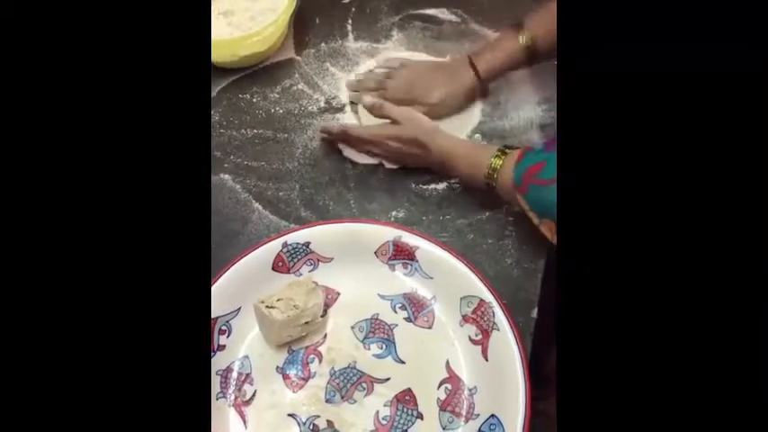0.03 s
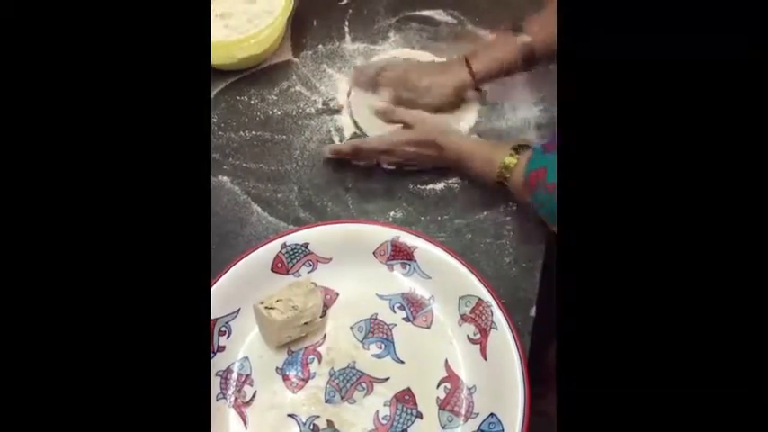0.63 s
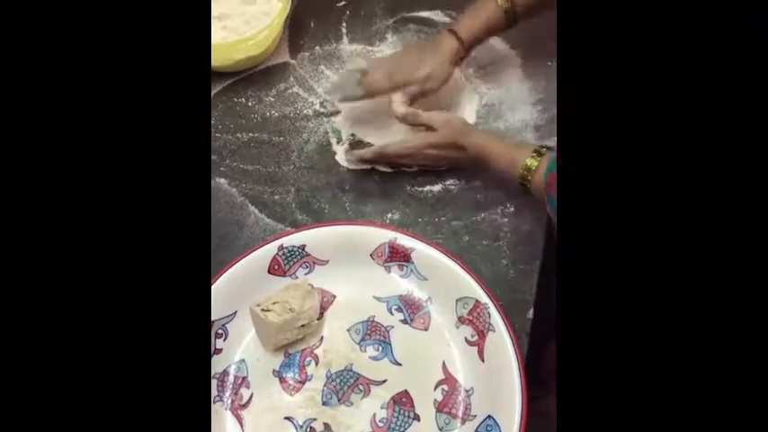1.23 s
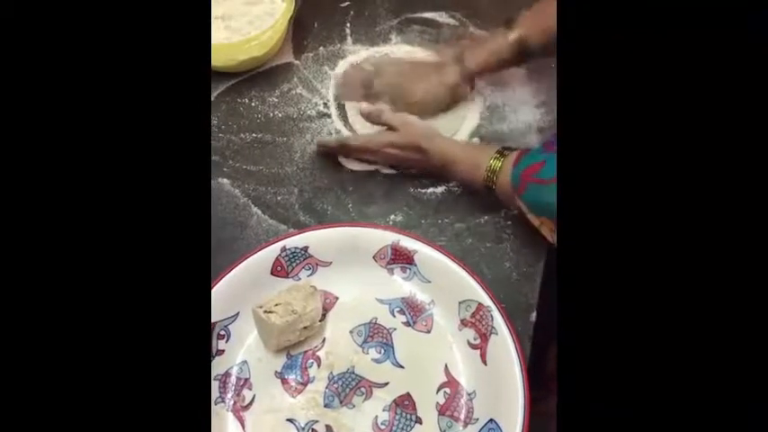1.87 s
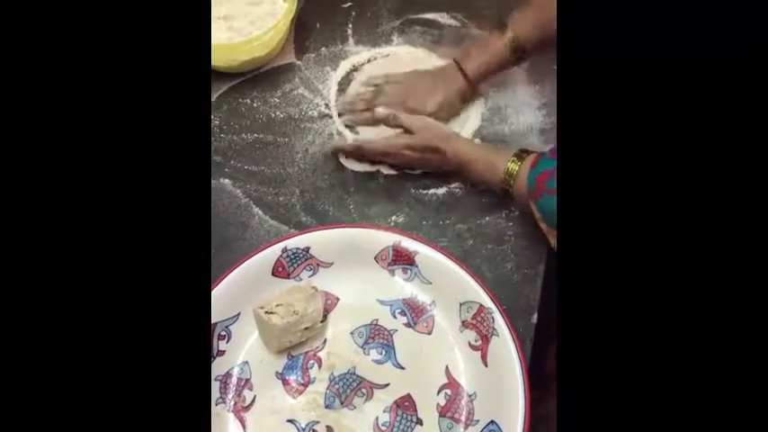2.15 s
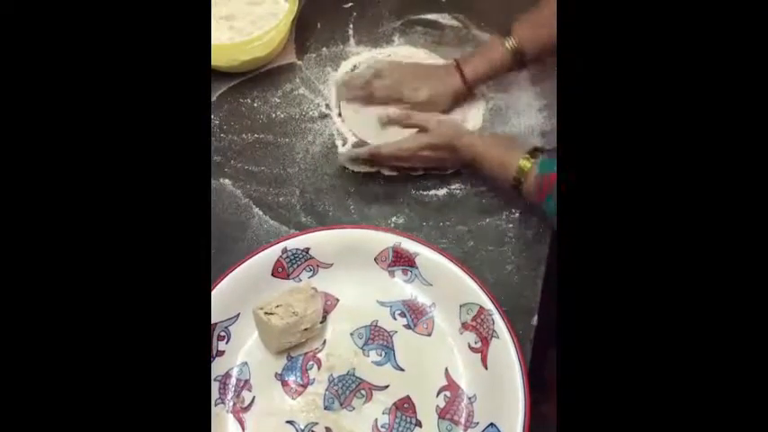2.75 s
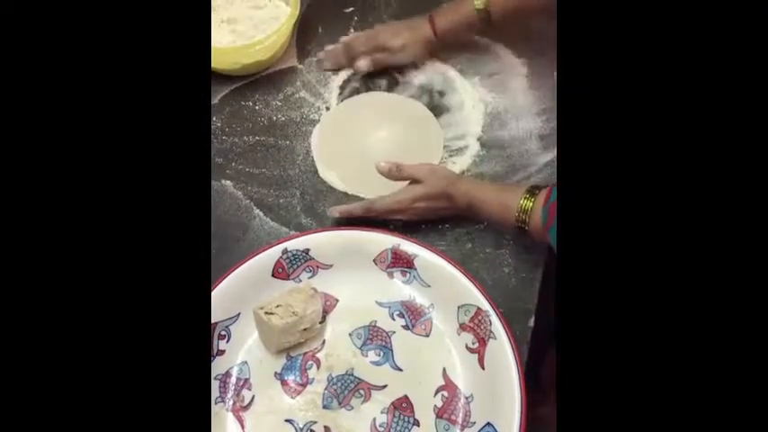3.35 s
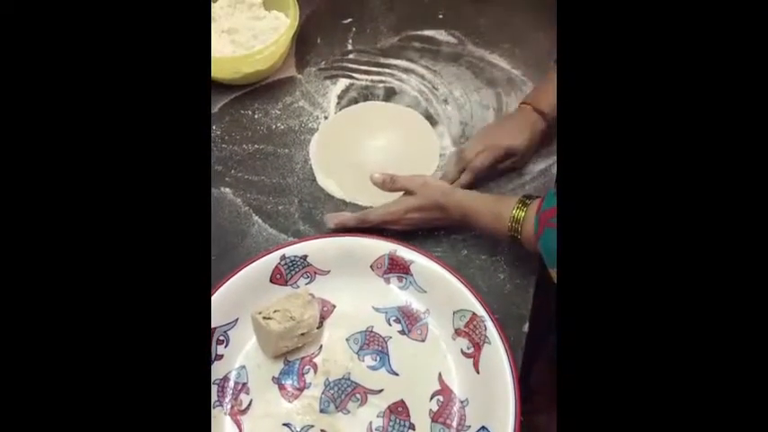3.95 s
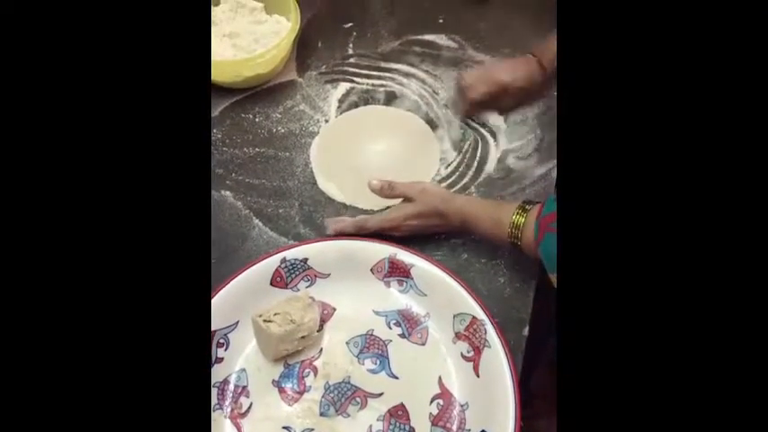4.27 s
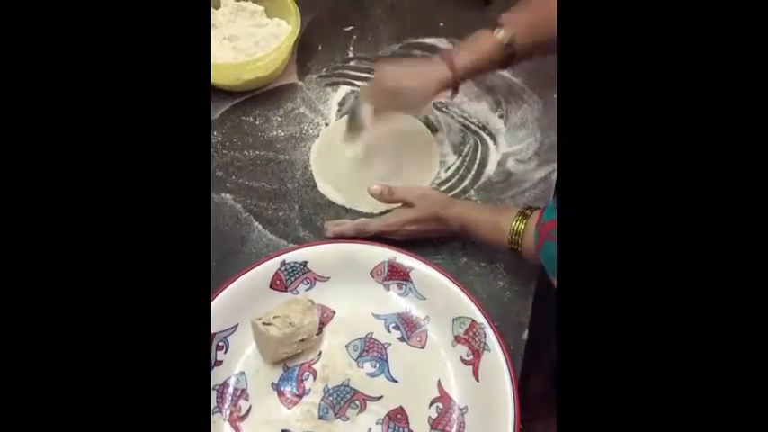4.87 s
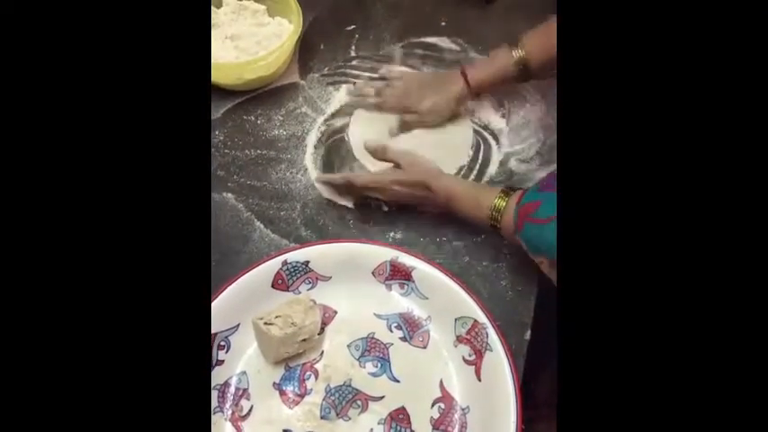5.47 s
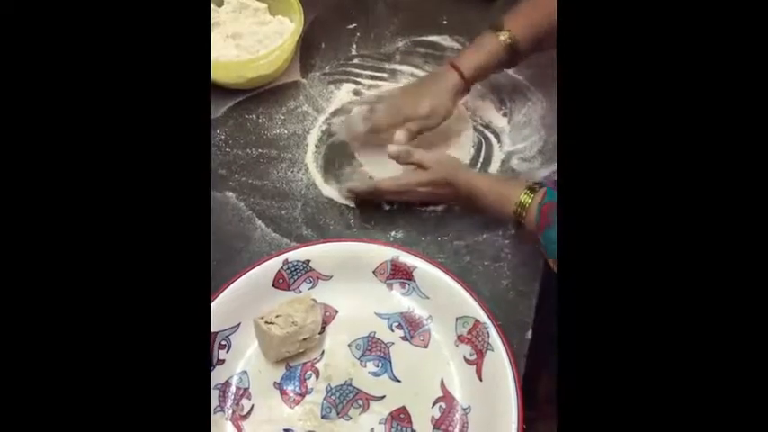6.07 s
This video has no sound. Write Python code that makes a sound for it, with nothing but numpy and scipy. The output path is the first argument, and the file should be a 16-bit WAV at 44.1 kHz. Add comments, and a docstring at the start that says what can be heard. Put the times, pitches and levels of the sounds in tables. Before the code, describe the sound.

Hands pat a round of dough flat on a floured countertop, about four pats a second, each a sharp smack with a low thud. The dough hisses faintly as it turns. The pats stop while a hand softly sweeps up flour and sprinkles a pinch, then three more pats follow. The microphone is close, in a small kitchen with a brief echo.

```python
"""A small kitchen, close to a floured counter: hands pat a round of dough flat, about four pats a second.
Each impact expels air in a smack and excites the counter's modes in a boom; the room reverberates briefly.
Sliding friction makes the dough hiss as it is turned on the flour. In the pause a hand sweeps flour
together and sprinkles it, then the pats resume. The house rumbles faintly throughout."""
import sys
import numpy as np
from scipy import signal
from scipy.fft import rfft, irfft, next_fast_len
from scipy.io import wavfile
from scipy.ndimage import uniform_filter1d

SR = 44100
rng = np.random.default_rng(int(sys.argv[2]) if len(sys.argv) > 2 else 0)


def unload_wav(signal):
    """Save mono or channel-first audio to the path in sys.argv[1] as 16-bit WAV at rate SR, clipped to [-1, 1]."""
    wavfile.write(
        sys.argv[1],
        SR,
        np.round(np.clip(np.atleast_2d(signal).T, -1, 1) * 32767).astype(np.int16),
    )


N = 269451
TIME = np.arange(N) / SR
RING_TIME = np.arange(SR) / SR


def undb(db):
    """Decibels to amplitude ratio."""
    return 10 ** (np.asarray(db) / 20)


def unit(x):
    """Normalisation to rms 1."""
    return x / np.sqrt(np.mean(x ** 2))


def add(out, start_s, x):
    """Superposition of x on out from start_s."""
    i = int(start_s * SR)
    out[i:i + len(x)] += x[:N - i]


def decay(age, t60):
    """Exponential damping: 60 dB down after t60 seconds."""
    return np.exp(-np.log(1000) * age / t60)


def walk(rate_hz):
    """Smooth random modulation with rms 1."""
    hold = int(SR / rate_hz)
    steps = np.repeat(rng.standard_normal(N // hold + 1), hold)
    return unit(uniform_filter1d(steps, hold)[:N])


def log_interp(hz, points):
    """Interpolation of (frequency, level) points on a log-frequency axis."""
    points = np.array(points)
    return np.interp(np.log(hz + 1), np.log(points[:, 0]), points[:, 1])


def causal(x, gain):
    """Minimum-phase filtering by a gain per bin, through the folded cepstrum."""
    cepstrum = irfft(np.log(gain), len(x))
    cepstrum[1:len(x) // 2] *= 2
    cepstrum[len(x) // 2 + 1:] = 0
    return irfft(rfft(x) * np.exp(rfft(cepstrum)), len(x))


def colour(x, spectrum, tilt_db=0):
    """Spectral shaping, with a tilt per octave about 2 kHz that levels off below 500 Hz."""
    padded = np.pad(x, (0, next_fast_len(2 * len(x)) - len(x)))
    hz = np.fft.rfftfreq(len(padded), 1 / SR)
    octaves = np.log2(np.maximum(hz, 500) / 2000)
    return causal(padded, undb(log_interp(hz, spectrum) + tilt_db * octaves))[:len(x)]


def whiten(x, bins):
    """Spectral whitening: ripple finer than the given number of bins survives."""
    power = uniform_filter1d(abs(rfft(x)) ** 2, size=bins)
    return causal(x, 1 / np.sqrt(power))


def resonance(x, hz, width_hz):
    """Second-order resonator with gain 1 at its centre."""
    return signal.lfilter(*signal.iirpeak(hz, hz / width_hz, fs=SR), x)


def pocket(x, hz, db, q):
    """Cavity resonance: trapped air lifts one band by db, with quality factor q."""
    return x + (undb(db) - 1) * resonance(x, hz, hz / q)


# low room modes: (frequency [Hz], bandwidth [Hz], relative level [dB])
RUMBLE_MODES = [(63.7, 15.7, 8), (94.4, 19.5, 3.5), (131.6, 20.4, 0), (194, 19, -3.5), (257.8, 5.8, -3),
                (293, 12, -6), (392, 19, -15)]
# background hiss: (frequency [Hz], relative spectral density [dB])
HISS_SPECTRUM = [(25, -16), (80, -5), (160, -4.5), (320, -4), (500, -11.5), (1000, -11.5), (1600, -14.5),
                 (3200, -15.5), (7000, -21), (11000, -21.5)]
def background(rumble_db=-56, wander_db=0.41, hiss_db=-59.5):
    """Standing waves in the room gather the rumble of the house, under a faint hiss."""
    rumble = 0
    for hz, width, db in RUMBLE_MODES:
        stage_width = 1.6 * width  # two stages in series narrow to about the mode's bandwidth
        first_stage = resonance(rng.standard_normal(N), hz, stage_width)
        rumble += undb(db) * resonance(first_stage, hz, stage_width)
    hiss = unit(colour(rng.standard_normal(N), HISS_SPECTRUM))
    return unit(rumble) * undb(rumble_db + wander_db * walk(4.4)) + hiss * undb(hiss_db)


# counter modes: (frequency [Hz], level [dB], decay time T60 [s], sign of first swing [+1 or -1])
COUNTER_MODES = [(85, -31.3, 0.252, -1), (104, -26.1, 0.35, -1), (109, -19.5, 0.266, -1),
                 (126, -16.2, 0.169, 1), (132, -25.7, 0.35, 1), (175, -33.7, 0.35, -1),
                 (192, -20.1, 0.175, 1), (239, -24.5, 0.09, 1), (258, -11.8, 0.161, -1),
                 (261, -11.9, 0.118, -1), (271, -25.4, 0.199, 1), (290, -26.1, 0.265, 1),
                 (337, -14.0, 0.08, -1), (352, -17.3, 0.09, 1), (383, -31.7, 0.21, 1),
                 (414, -37.0, 0.251, -1), (514, -36.7, 0.214, -1), (545, -34.5, 0.186, -1),
                 (581, -23.8, 0.067, 1), (613, -20.1, 0.067, 1), (642, -40.1, 0.263, -1),
                 (767, -26.3, 0.083, 1)]
def boom(swell_s=0.007, detune=0.004):
    """Modal vibration: soft dough spreads the blow, so the counter's modes swell before they decay."""
    hz, db, t60, sign = np.array(COUNTER_MODES).T[:, :, None]
    hz = hz * (1 + detune * rng.standard_normal())  # the hand's weight shifts the modes
    modes = sign * undb(db) * np.sin(2 * np.pi * hz * RING_TIME) * decay(RING_TIME, t60)
    return modes.sum(axis=0) * (1 - np.exp(-RING_TIME / swell_s))


def room_bass(hz=90, width_hz=70, t60=1.0, db=-54):
    """Low-frequency impulse response: bass reverberates longer than treble."""
    return undb(db) * resonance(rng.standard_normal(SR), hz, width_hz) * decay(RING_TIME, t60)


def air_burst(landing_ms, count=4, snap_s=0.00067, squeeze_s=0.0057, squeeze_db=-7.5, scatter_db=2):
    """Air expulsion: palm and fingers land in turn, each with a snap; the rest is squeezed out after."""
    t = RING_TIME[:SR // 20]
    contacts_s = 0.0007 + (np.arange(count) + rng.random(count)) / count * landing_ms / 1000
    age = t - contacts_s[:, None]
    strengths = undb(scatter_db * rng.standard_normal((count, 1)))
    snaps = (strengths * (age > 0) * np.exp(-abs(age) / snap_s)).sum(axis=0)
    squeeze = undb(squeeze_db) * np.exp(-t / squeeze_s)
    return (snaps + squeeze) * rng.standard_normal(len(t))


# skin striking dough: (frequency [Hz], relative level [dB])
SMACK_SPECTRUM = [(80, -17), (300, 0), (500, -8.5), (630, -8.5), (800, -8.5), (1000, -3.5), (1600, -4.5),
                  (2500, -7.5), (3200, -12.5), (4000, -12.5), (5100, -11.5), (6400, -15), (8200, -15.5),
                  (11000, -22.5)]
def smack(burst, tilt_db, palm_hz, cupped_hz=810, cupped_db=7.5, flat_hz=1490, flat_db=2):
    """Cavity resonance: a cupped palm traps more air, so it rings lower and stronger than a flat one."""
    palm_db = log_interp(palm_hz, [(cupped_hz, cupped_db), (flat_hz, flat_db)])
    return pocket(colour(burst, SMACK_SPECTRUM, tilt_db), palm_hz, palm_db, q=3)


# resonances of the early room response: (frequency [Hz], bandwidth [Hz], relative level [dB])
EARLY_ROOM_RESONANCES = [(800, 12, -26), (943, 77, 9), (1357, 67, 2.5), (1718, 58, -0.5), (2222, 71, 8),
                         (2580, 51, 5), (5370, 72, 0)]
def with_early_room_rings(x, gain_db=-4):
    """Early reflections from nearby surfaces give each smack the same short ringing tones."""
    x = np.pad(x, (0, SR // 10))
    return x + sum(undb(gain_db + db) * resonance(x, hz, width) for hz, width, db in EARLY_ROOM_RESONANCES)


# kitchen reverberation: (frequency [Hz], decay time T60 [s], relative level [dB])
REVERB_BANDS = [(278, 0.57, 0), (1070, 0.44, -5.5), (2320, 0.39, -2.5), (5370, 0.37, -9),
                (10300, 0.36, -13.5)]
def kitchen_echoes(early_db=-25, early_t60=0.14, late_db=-35, delay_s=0.00299):
    """Impulse response: dense early reflections off counter and wall, then the room's diffuse tail."""
    hz = np.fft.rfftfreq(SR, 1 / SR)
    centres_hz = np.array(REVERB_BANDS)[:, 0]
    noise = rfft(rng.standard_normal(SR))
    age = np.maximum(RING_TIME - delay_s, 0)
    echoes = 0
    for share, (_, t60, db) in zip(np.eye(len(REVERB_BANDS)), REVERB_BANDS):
        band = irfft(noise * np.interp(hz, centres_hz, share), SR)
        fade = undb(early_db) * decay(age, early_t60) + undb(late_db) * decay(age, t60)
        echoes += undb(db) * band * fade
    return echoes * (RING_TIME > delay_s)


# hand impacts: (time [s], boom gain [dB], relative smack level [dB], tilt [dB/octave],
#                landing duration [ms], palm cavity [Hz], finger cavity [Hz])
IMPACTS = [(0.1225, 0, 0.5, 2, 3.24, 590, 4630), (0.3662, 1, .5, 0.9, 2.8, 2070, 4800),
           (0.6171, -4.5, -9.5, 1.2, 3.5, 820, 1900), (0.9133, 0, -1.5, 1.14, 2.8, 1310, 4500),
           (1.162, 2, 3.5, 0.8, 3.3, 1950, 5230), (1.406, -1.5, -1.5, 2.5, 3.4, 1040, 2930),
           (1.668, -5.5, -10.5, 1.1, 2.15, 915, 2400), (2.0173, .5, 1, 2.5, 2.28, 626, 5900),
           (2.2588, 2, 1.5, 0.64, 2.86, 1460, 3370), (2.5108, -1, 0, 0.5, 0.58, 3000, 5940),
           (2.769, -4, -4, -1.3, 4.2, 1830, 2900), (5.1398, -26.5, -28.5, -1, 6, 695, 1450),
           (5.561, -.5, -2, 0.3, 3, 790, 2050), (5.8135, 2, 1.2, 0, 1.56, 1360, 2960),
           (6.063, .5, -1.5, 0.5, 3.9, 895, 1700)]
def pats(smack_db=18):
    """Impact excitation: each pat radiates a boom and a smack, heard directly and by reflection."""
    out = np.zeros(N)
    for start, boom_db, db, tilt_db, landing_ms, palm_hz, finger_hz in IMPACTS:
        thud = undb(boom_db) * boom()
        add(out, start, thud)
        add(out, start, signal.fftconvolve(thud, room_bass()))
        burst = air_burst(landing_ms)
        gain = undb(smack_db + db)
        # the snaps interfere in a spectral ripple on the direct path; over all directions it averages out
        direct = gain * smack(whiten(burst, bins=25), tilt_db, palm_hz)
        diffuse = gain * smack(whiten(burst, bins=5), tilt_db, palm_hz)
        add(out, start, signal.fftconvolve(diffuse, kitchen_echoes()))
        direct = pocket(direct, finger_hz, db=5.5, q=3)  # the finger cavity is heard only close by
        add(out, start, with_early_room_rings(direct))
    return out


def rub(spectrum, grain_db=1, judder_db=0):
    """Granular friction: flour slips in dense tiny ticks; judder is uneven sliding pressure."""
    grains = rng.standard_normal(N) * undb(grain_db * walk(1500))
    return unit(colour(grains, spectrum)) * undb(judder_db * walk(35))


def stroke(start, length, peak, power):
    """Power-law envelope of a move from rest to rest, highest at the fraction peak of its length."""
    progress = np.interp(TIME, start + length * np.array([0, peak, 1]), [0, 0.5, 1])
    return abs(np.sin(np.pi * progress)) ** power


def strokes(rows, peak, power):
    """Friction noise grows as a power of sliding speed; overlapping moves add in energy."""
    energies = ((undb(db) * stroke(start, length, peak, power)) ** 2 for start, length, db, *_ in rows)
    return np.sqrt(sum(energies))


# pushes that turn the dough: (time [s], duration [s], level [dB])
PUSHES = [(.615, 0.18, -49.5), (1.65, 0.23, -48.5), (2.75, 0.25, -51.5), (2.91, 0.33, -49),
          (5.125, .3, -47.5)]
# dough sliding on flour: (frequency [Hz], relative level [dB])
DOUGH_SPECTRUM = [(300, -14), (750, -23), (980, -3), (1200, -10.5), (1500, -1.5), (2200, -4), (3900, -5.5),
                  (6000, -5), (8800, -4), (11000, -10.5)]
def turning(hollow_hz=2130, gap_hz=980):
    """Sliding friction of dough on flour, coloured by the hand's hollow and the gap under the dough."""
    slide = pocket(rub(DOUGH_SPECTRUM), hollow_hz, db=5, q=7)
    slide = pocket(slide, gap_hz, db=4, q=7)
    return strokes(PUSHES, peak=0.41, power=0.72) * unit(slide)


def hollow(hz, flutter_hz=115):
    """Noise-driven resonance: amplitude and phase flutter about a centre frequency."""
    lowpass = signal.butter(2, flutter_hz, fs=SR, output="sos")
    flutter = signal.sosfilt(lowpass, rng.standard_normal((2, N)))
    phase = 2 * np.pi * hz * TIME
    return unit(flutter[0] * np.cos(phase) + flutter[1] * np.sin(phase))


# skin sliding on flour: (frequency [Hz], relative level [dB])
FLOUR_SPECTRUM = [(400, -22), (1000, -2.5), (1900, -2), (2500, -3.5), (3300, 1), (5000, 2.5), (6500, 4.5),
                  (8700, 6), (11000, 0.5)]
# hand sweeps: (time [s], duration [s], relative hiss level [dB], hollow [Hz], relative ring level [dB])
HAND_SWEEPS = [(3.452, 0.65, -45, 1436, -52), (4.047, 0.4, -55, 1570, -70),
               (4.328, .23, -54.5, 1570, -67.5)]
def sweeping(hiss_db=0.5, hollow_db=-1):
    """Friction and cavity resonance: a hand gathers flour, its hollow ringing as it cups and opens."""
    hiss = unit(pocket(rub(FLOUR_SPECTRUM, judder_db=1.15), hz=2520, db=7, q=6))
    out = undb(hiss_db) * strokes(HAND_SWEEPS, peak=0.42, power=1.06) * hiss
    for start, length, _, hz, ring_db in HAND_SWEEPS:
        cupping = stroke(start, length, peak=0.52, power=1.27)
        out += undb(hollow_db + ring_db) * cupping * hollow(hz)
    return out


# fingertip rubs: (time [s], duration [s], level [dB])
FINGER_RUBS = [(4.61, 0.067, -57), (4.655, .115, -56), (4.83, 0.15, -55.5), (4.88, .045, -49.5)]
def sprinkling():
    """Granular friction between the fingertips as they let a pinch of flour go."""
    return strokes(FINGER_RUBS, peak=0.45, power=1.1) * rub(FLOUR_SPECTRUM)


def scene():
    """Superposition of pats, sliding dough, flour and background in one channel."""
    return (pats() + turning() + sweeping() + sprinkling() + background())[None]


def record(dry, ceiling=0.85, cutoff_hz=10900):
    """Soft saturation rounds the sharpest peaks; a steep low-pass limits the bandwidth."""
    rounded = dry / (1 + (dry / ceiling) ** 6) ** (1 / 6)
    lowpass = signal.ellip(10, 0.2, 75, cutoff_hz, fs=SR, output="sos")
    return signal.sosfilt(lowpass, rounded)


dry = scene()
out = record(dry)
unload_wav(out)
```